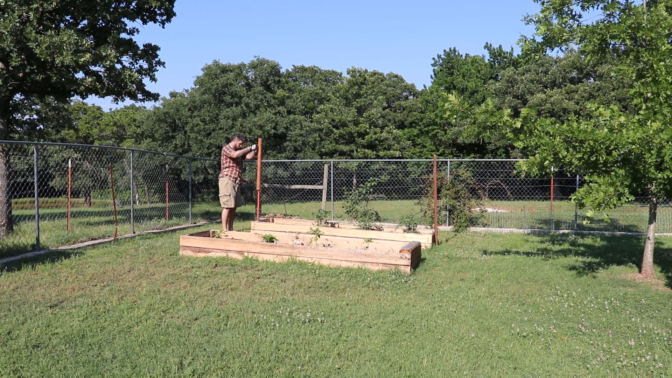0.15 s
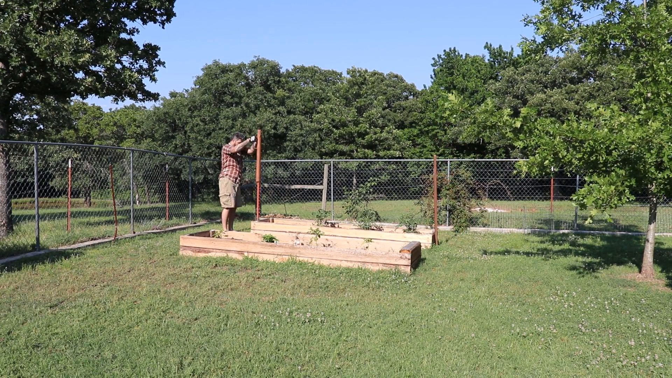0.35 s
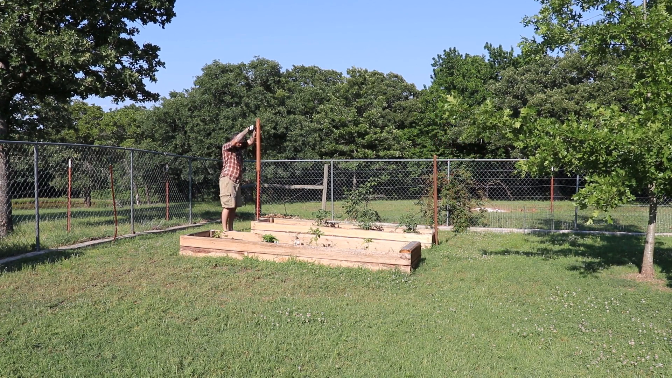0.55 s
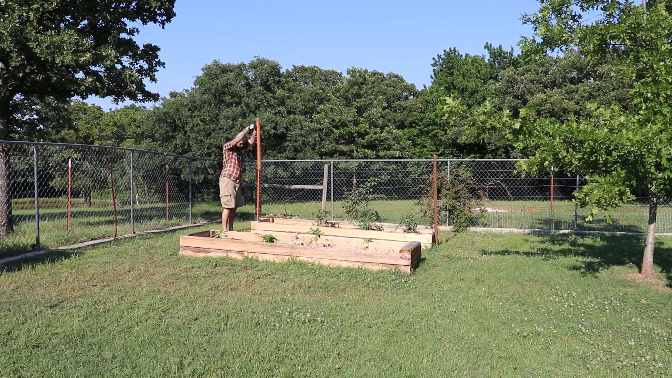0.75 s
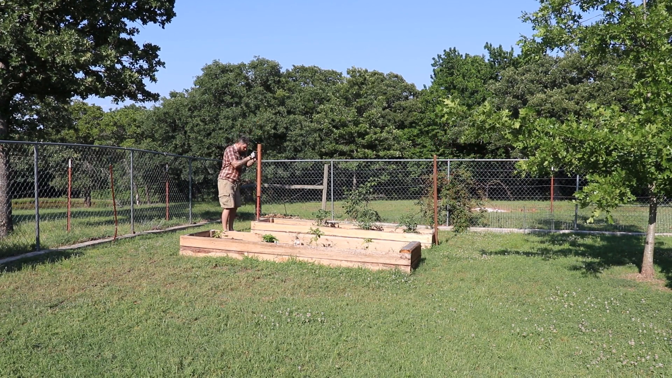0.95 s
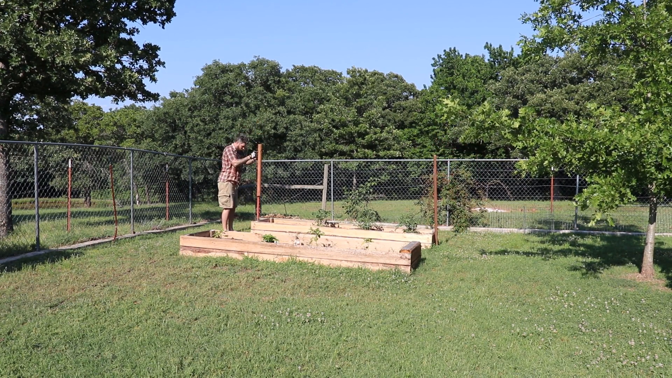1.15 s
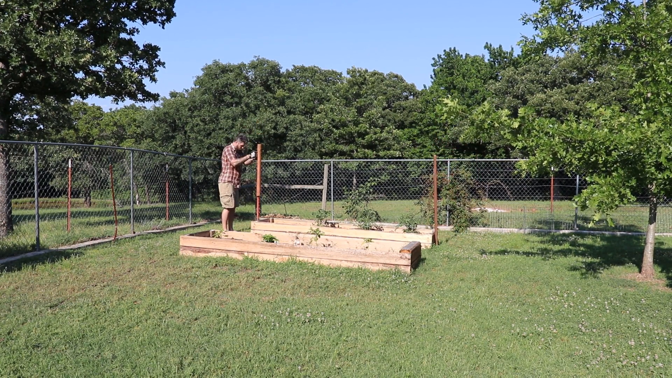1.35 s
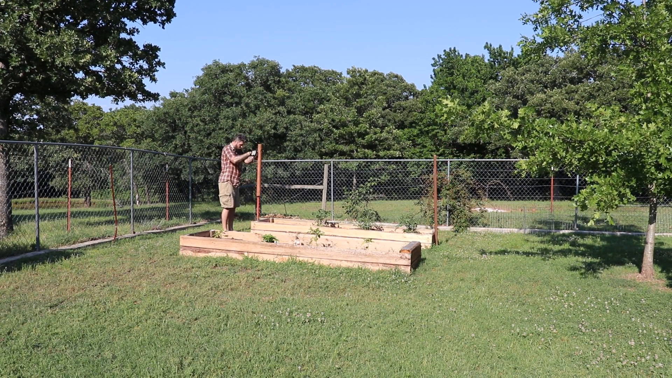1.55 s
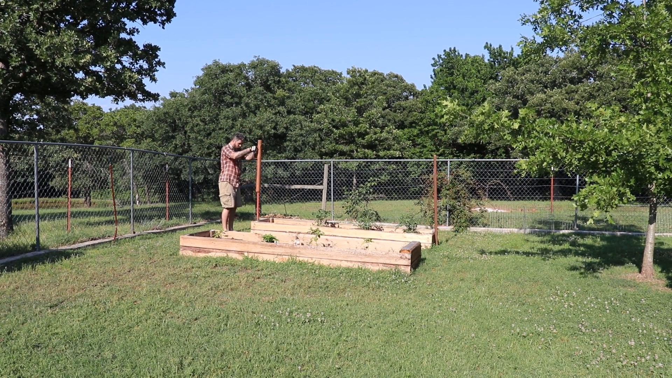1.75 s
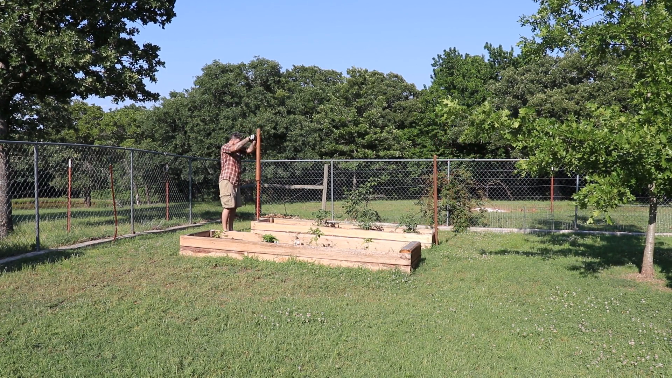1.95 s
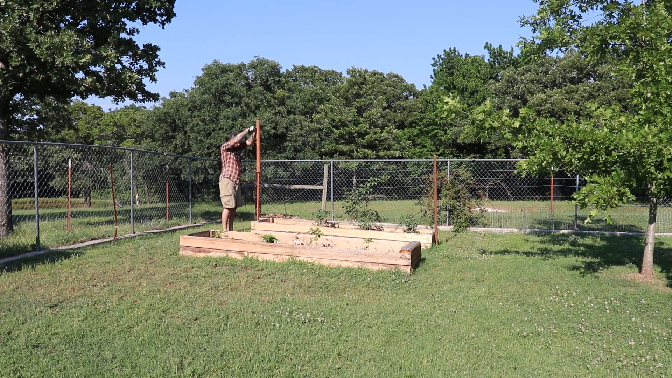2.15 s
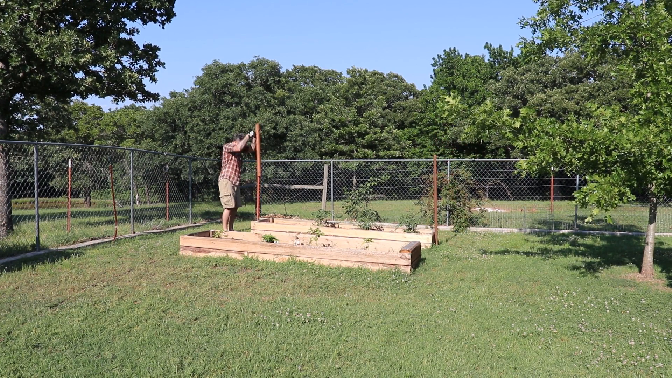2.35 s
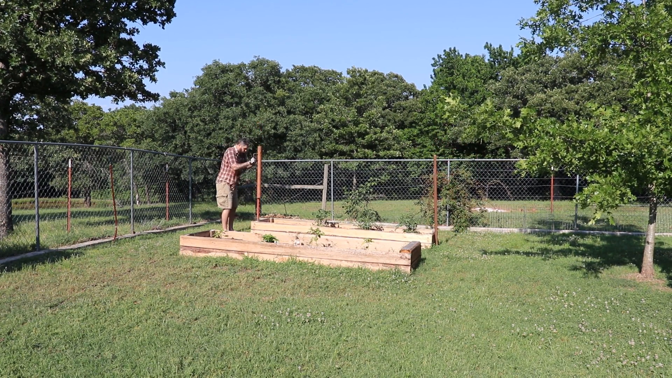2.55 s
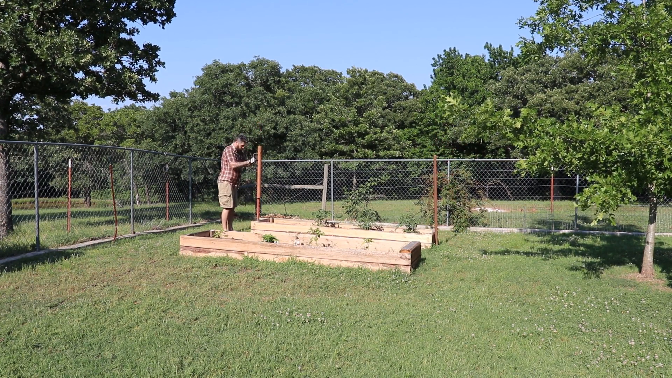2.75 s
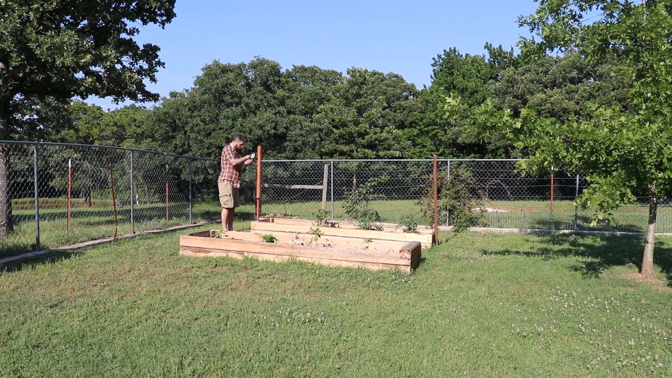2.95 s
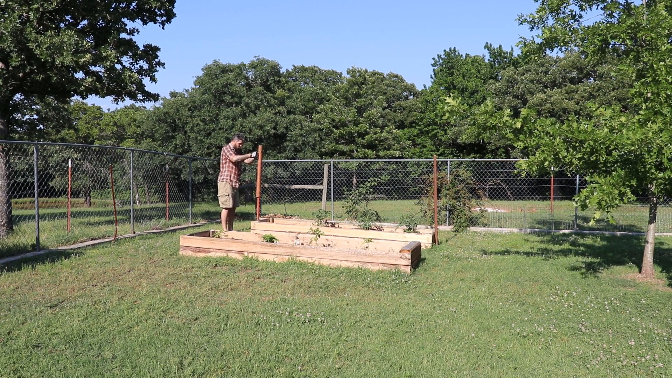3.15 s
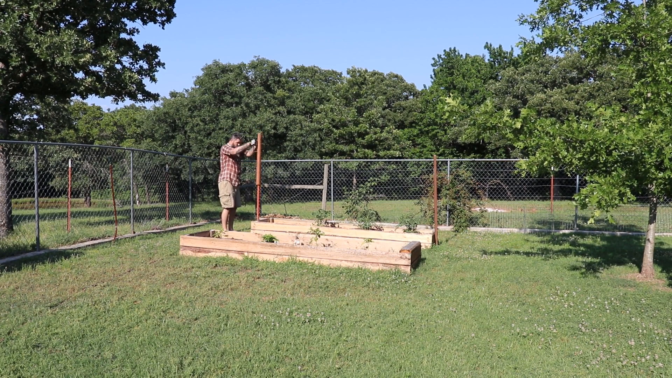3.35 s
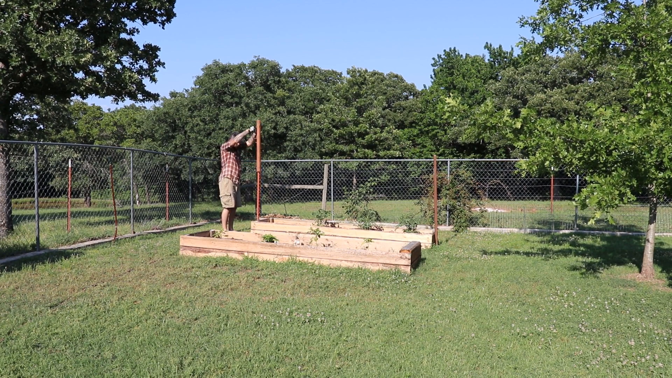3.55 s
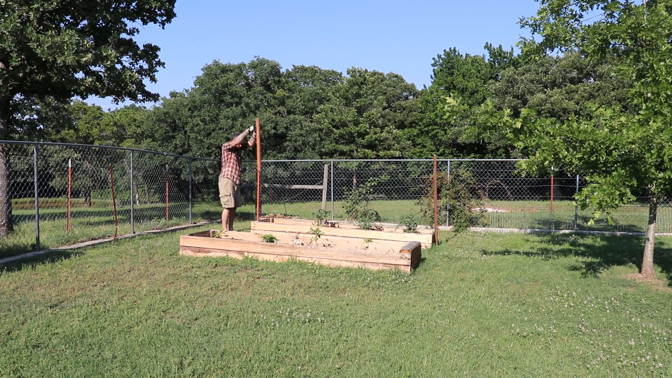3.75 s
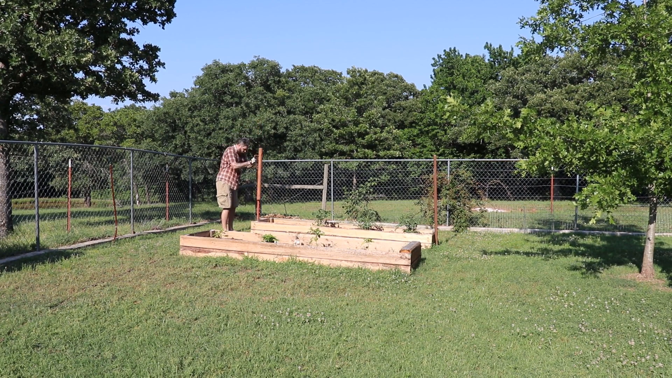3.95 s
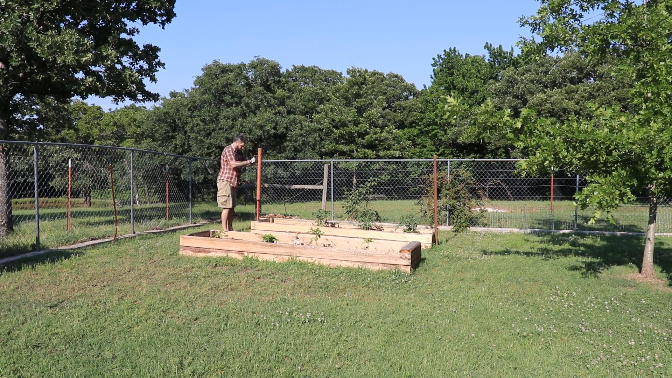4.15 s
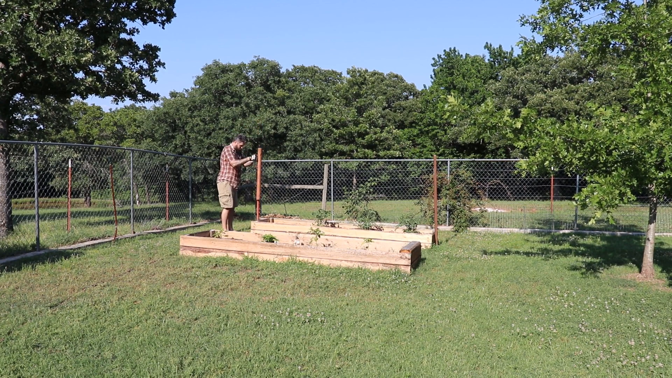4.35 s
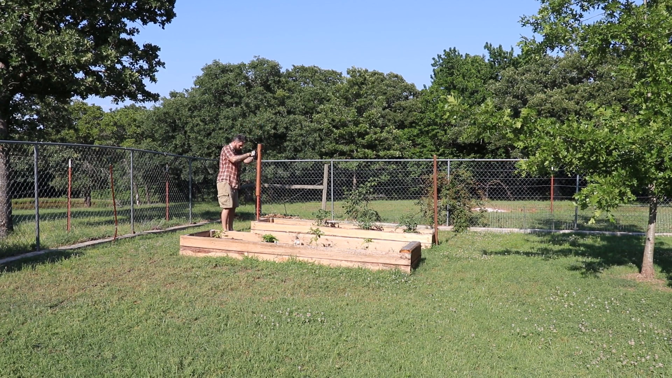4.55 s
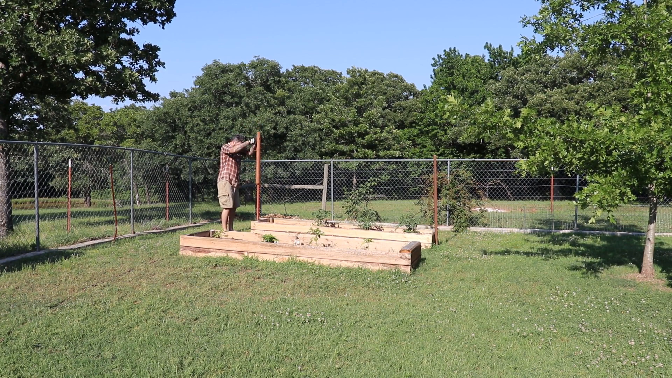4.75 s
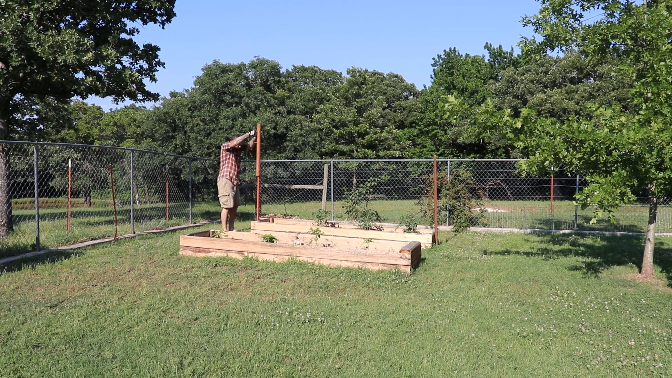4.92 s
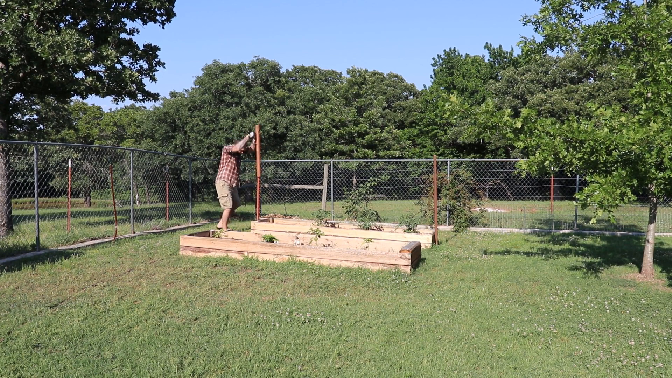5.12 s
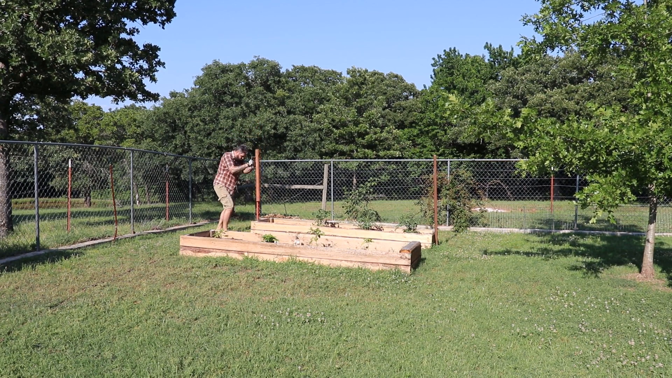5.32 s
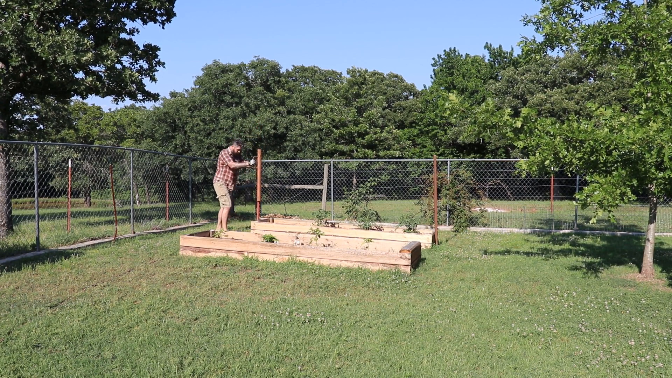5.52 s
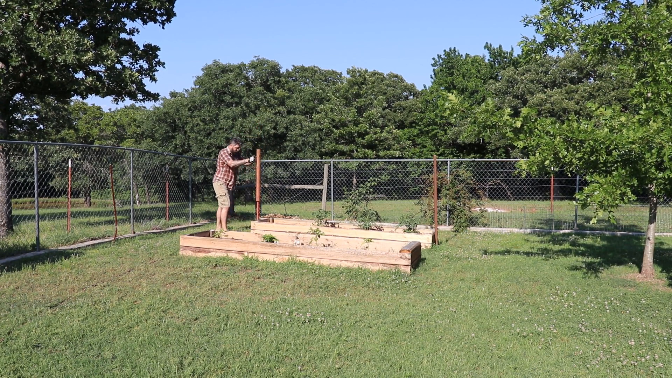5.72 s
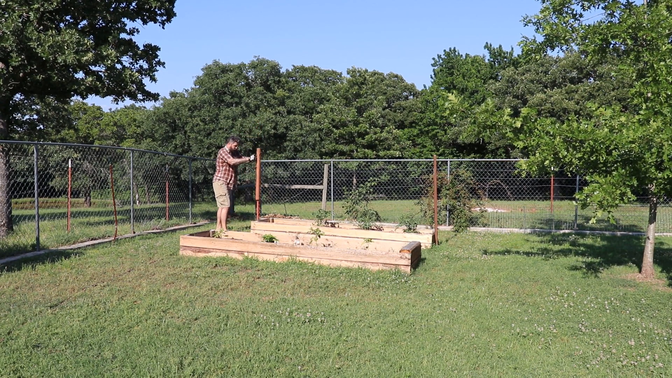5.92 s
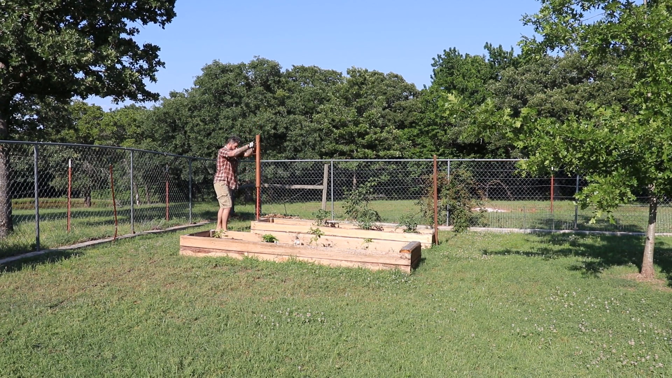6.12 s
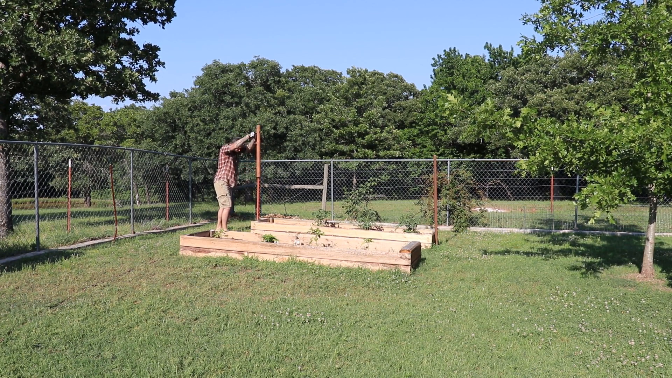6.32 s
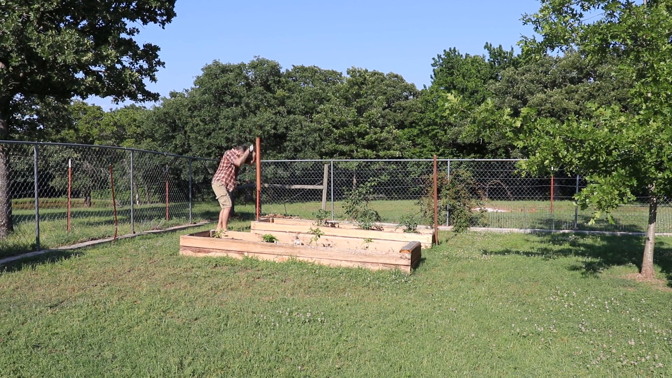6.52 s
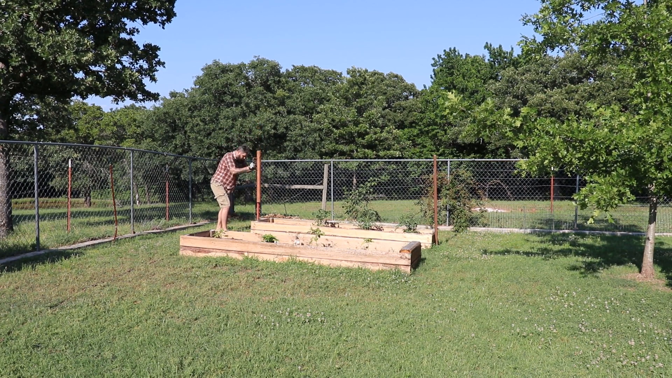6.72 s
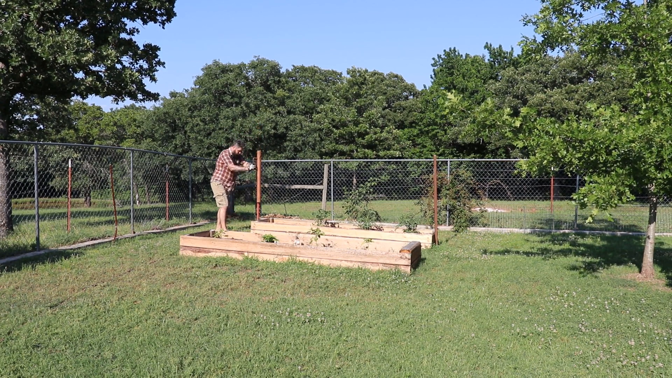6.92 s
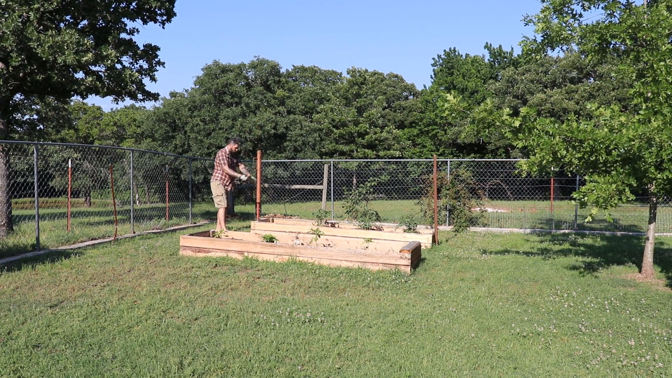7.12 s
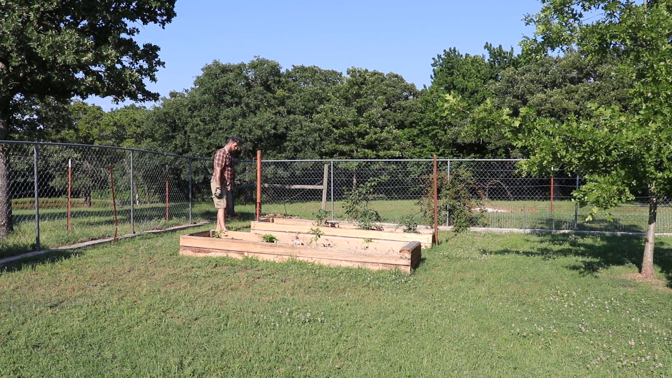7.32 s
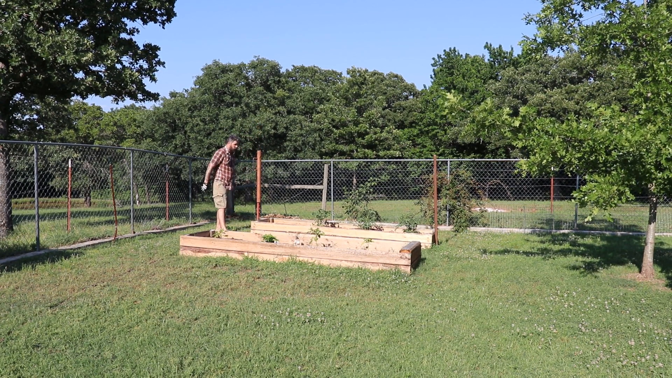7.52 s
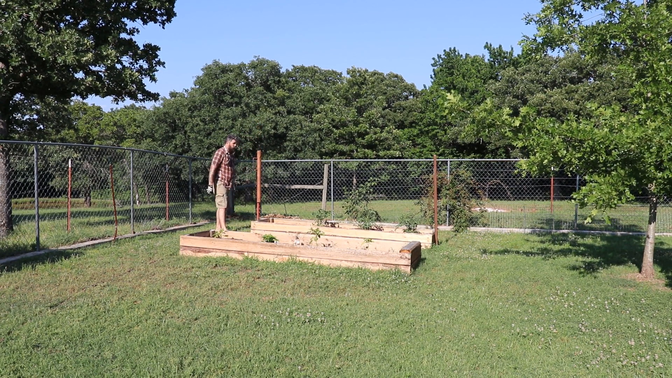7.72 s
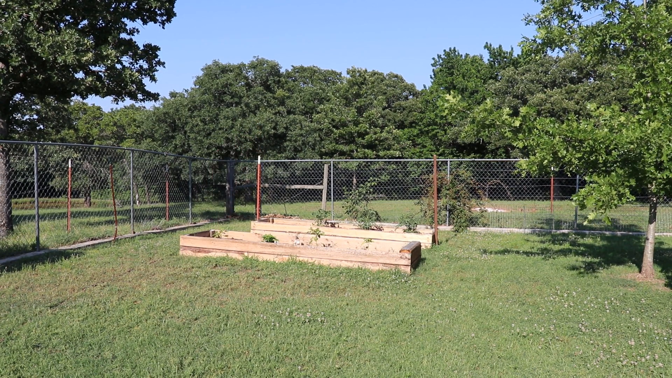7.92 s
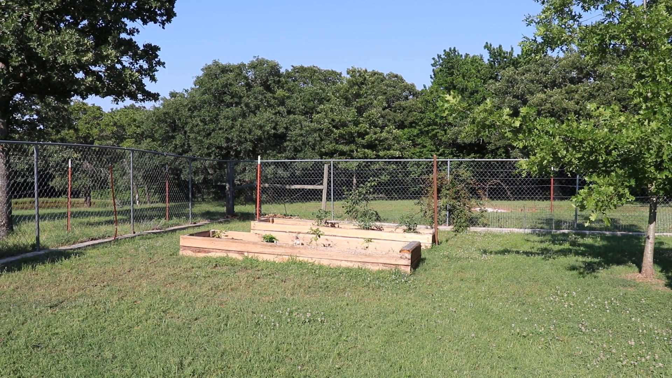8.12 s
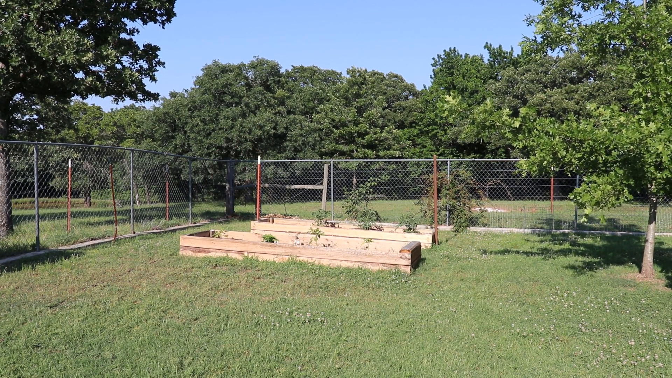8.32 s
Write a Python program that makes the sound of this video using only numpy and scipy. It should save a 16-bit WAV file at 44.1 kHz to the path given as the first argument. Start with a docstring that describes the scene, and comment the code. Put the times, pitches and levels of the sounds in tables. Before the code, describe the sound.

In a breezy garden, a man drives a steel fence post with a heavy capped tube. Light knocks and a rising scrape lead to a quick rattle and a loud, bright slam, five times, about every one and a half seconds. Each clang scatters back from fence and trees. After the last, a soft knock leaves a faint hum. Distant microphone, low wind, tiny bird trills, and a brief close rustle at the end.

```python
"""Fence post driven with a capped steel tube

Five strokes heard across a garden: the tube knocks, scrapes up the post, rattles down and slams home.
Clicks, grains and bursts excite decaying modes of post and tube; a noise tail scatters the clang back.
Filtered noise makes wind, hush and a late rustle; swept sines make a faint bird. Loud peaks duck the gain."""
import sys
import numpy as np
from scipy import signal
from scipy.fft import rfft, irfft, next_fast_len
from scipy.io import wavfile

SR = 44100
rng = np.random.default_rng(int(sys.argv[2]) if len(sys.argv) > 2 else 0)


def transcribe(u):
    """Save the signal u as a 16-bit wav file named by the first command-line argument.

    u: samples, shape (n,) or (channels, n), limited to [-1, 1]; the rate is SR.
    q: integer samples, one column per channel.
    """
    v = np.clip(np.atleast_2d(u).T, -1, 1)
    q = np.round(v * 32767).astype(np.int16)
    wavfile.write(sys.argv[1], SR, q)


N = 373518
TIME = np.arange(N) / SR

# Table levels are relative; gains inside the functions set the mix.
# wind gusts: peak t/s, half length/s, level/dB
GUSTS = [(0.198, 0.36, -44.5), (1.55, 0.17, -47), (2.09, 0.28, -39), (3.67, .12, -37.5), (4.204, .15, -46),
         (5.047, 0.6, -44.5), (5.686, .3, -49.5), (6.797, 0.43, -48)]
# wind colour: f/Hz, density/dB per Hz
WIND_COLOUR = [(15, -0.5), (30, 0.5), (60, -5.5), (100, -10), (160, -20), (300, -33.5), (1000, -52.5)]
# hush colour: f/Hz, density/dB per Hz
HUSH_COLOUR = [(76, -13.5), (130, 1.5), (285, -7), (356, -4.5), (829, -8), (1400, -9), (1580, -10.5),
               (3010, -18), (14500, -24), (16000, -26)]
# small bird's trills: peak t/s, level/dB
TRILLS = [(0.169, -62), (1.90, -57), (3.769, -76), (5.84, -65), (6.381, -78), (7.80, -63.5), (8.10, -63)]
# tube knocks sideways on post: t/s, level/dB, tube hum re knock/dB, tube ring re knock/dB
KNOCKS = [(0.213, -23.5, 0, -5), (0.303, -28, 6, 4.5), (0.825, -43.5, 5.5, 18), (0.862, -28, 4.5, -12.5),
          (.893, -26, -4.5, 9.5), (.942, -21, -22.5, -3), (1.674, -27.5, 4.5, -4.5), (1.707, -24, -7, -7),
          (1.774, -35.5, 1, 10), (1.911, -32.5, 5, 8), (1.948, -34, 5.5, 16), (2.379, -21, -4.5, -0.5),
          (2.461, -18, -16, 6), (2.486, -17, -4, -10.5), (3.205, -18, 0, -4.5), (3.316, -32, -17, 13.5),
          (3.355, -33.5, 8, 14), (3.577, -32, 10, 19.5), (3.845, -26, 2, -1), (3.896, -13.5, -4, -10.5),
          (4.483, -24.5, -7.5, -12), (4.562, -33, -3.5, -8.5), (4.604, -34.5, 4, 10), (4.741, -29.5, -6, 2),
          (5.177, -15.5, -1.5, -4), (5.224, -20, -6.5, 8.5), (5.254, -19, -7.5, 7.5), (5.578, -25, -8, -11),
          (5.763, -27, -2, -1), (5.903, -33.5, -3.5, 0.5), (5.978, -18.5, -2, -13), (6.014, -24.5, -10, 3),
          (6.24, -40.5, 10, 20.5), (6.395, -38, 5, -11), (6.466, -35, 3.5, -5), (6.519, -18, -2.5, -16.5),
          (6.602, -19.5, -14.5, 1.5), (7.322, -30.5, -27, -1)]
# post modes, damped by soil: f/Hz, level/dB, t60/s
POST_MODES = [(415.2, -17, 0.2), (538, -29.5, 0.11), (909, -17, 0.12), (1175.5, -11, 0.24),
              (1209, -19, .22), (1524, -11, 0.12), (1706, -21, 0.41), (1735, -19.5, 0.32),
              (1988, -14.5, 0.18), (2062, -19.5, 0.49), (2387, -14, 0.2), (2530, -23.5, 0.3),
              (2855, -12.5, 0.089), (3217, -17, 0.19), (3380, -31, 0.054), (3870, -14.5, 0.45),
              (4004, -13, 0.23), (4437, -23, 0.25), (4365, -18.5, 0.26), (4800, -14, 0.096),
              (5270, -23, 0.31), (7210, -8.5, 0.091), (7400, -13, .12), (8800, -12, 0.12),
              (9420, -21.5, 0.45)]
# tube wall flexing out of round, low modes: f/Hz, level/dB, t60/s
TUBE_HUM_MODES = [(1340, -12, 0.95), (1397, -18.5, 1.2)]
# the same, high modes: f/Hz, level/dB, t60/s
TUBE_RING_MODES = [(3776, -17.5, 0.45), (3825, -11.5, 0.67), (3840, -39, 0.27), (7195, -11.5, 0.31),
                   (7290, -10, 0.12), (11690, -21, 0.33), (11200, -24, .17)]
# dense short modes under light contacts: f/Hz, density/dB per Hz
CLANK_COLOUR = [(60, -18), (200, -11), (310, 4.5), (420, -7.5), (750, 1), (1300, 1), (2200, 3), (3300, -4),
                (4300, 5.5), (6200, -12.5), (7800, 2.5), (10500, -17.5), (16000, -19.5)]
# garden echo envelope: delay t/s, level/dB
ECHO_ENVELOPE = [(0, 5), (.05, -9), (.11, -9.5), (.128, -5), (.165, 0.5), (.21, -9), (.35, -21.5),
                 (.6, -40.5), (1.0, -59)]
# garden echo colour: f/Hz, level/dB
ECHO_COLOUR = [(100, -1.5), (430, -9.5), (530, -15.5), (620, -0.5), (690, -11.5), (1020, -2), (1200, 11.5),
               (1450, -4), (1700, -3), (2000, 1.5), (2900, -1), (5000, 0.5), (8000, 2), (16000, -6)]
# tube dragged up post: start t/s, fastest t/s, end t/s, friction/dB, hum re friction/dB, ring re friction/dB
LIFTS = [(0.345, 0.525, 0.68, -40.5, 1, 8), (1.946, 2.01, 2.06, -35.5, 3, 3),
         (3.425, 3.496, 3.85, -40.5, 7, 8), (4.703, 4.812, 5.0, -38, 4, 6),
         (6.0, 6.09, 6.27, -34, 7.5, -1.5)]
# tube rim grazes post: start t/s, end t/s, level/dB
GRAZES = [(0.82, .9, -49.5), (2.31, 2.38, -57), (3.744, 3.788, -61.5), (5.151, 5.182, -48),
          (5.766, 5.797, -59), (5.952, 5.981, -41), (6.458, 6.53, -49.5), (7.29, 7.337, -63)]
# tube drops: start t/s, end t/s, rattle level/dB
FALLS = [(.864, 0.997, -18.5), (2.363, 2.477, -25), (3.825, 3.985, -21.5), (5.19, 5.27, -19.5),
         (6.522, 6.612, -18)]
# cap slams onto post: t/s, level/dB, t60/s, tube ring re blow/dB
BLOWS = [(.9700, 3.5, 0.052, 0), (.9870, -4.5, 0.087, -1.5), (2.4939, 4, 0.084, -2), (3.971, 4, 0.056, 3.5),
         (5.2839, 4, 0.067, 7), (6.6103, 6, 0.08, 9.5)]
# dense short modes under a full blow: f/Hz, density/dB per Hz
SLAM_COLOUR = [(40, -12), (125, -3), (240, -16.5), (380, -9), (520, 3), (900, -9), (1250, -5), (1950, -1),
               (2900, -9.5), (3900, -0.5), (6200, -12.5), (7300, -5), (10800, -16), (13500, -17.5),
               (16000, -28)]
# tube and handles, undamped by hands: f/Hz, level/dB, t60/s
LET_GO_MODES = [(902, -36.5, 0.36), (1350, -41, 1.66), (1755, -52, 0.32), (2525, -62, 1.6)]
# soft rustle close by: t/s, level/dB
RUSTLE_ENVELOPE = [(8.238, -85), (8.25, -49.5), (8.3, -51.5), (8.36, -50.5), (8.47, -54.5)]
# rustle colour: f/Hz, density/dB per Hz
RUSTLE_COLOUR = [(120, -24), (200, -3), (569, -26), (623, -22), (722, -33), (1100, -32), (1320, -30.5),
                 (1980, -16), (3900, -22.5), (8740, -18), (16000, -32)]


def from_db(db):
    """Decibels to gain."""
    return 10 ** (np.asarray(db) / 20)


def rms_one(x):
    """Scale to rms 1."""
    return x / np.sqrt(np.mean(x ** 2) + 1e-20)


def at_hz(points, hz):
    """Gain of a spectrum table, interpolated in dB over log frequency."""
    table_hz, db = np.transpose(points)
    return from_db(np.interp(np.log(hz + 1), np.log(table_hz), db))


def noise(spectrum, size=N):
    """Noise of the given colour, rms 1."""
    padded = next_fast_len(size, True)
    white_spectrum = rfft(rng.standard_normal(padded))
    gain = at_hz(spectrum, np.fft.rfftfreq(padded, 1 / SR))
    return rms_one(irfft(white_spectrum * gain, padded)[:size])


def drift(per_s):
    """Slow random wander, spread about 1."""
    knots = rng.standard_normal(4000)
    return np.interp(TIME * per_s, np.arange(len(knots)), knots)


def cut(x, hz, kind="low", order=2):
    """Low-pass or high-pass."""
    sos = signal.butter(order, min(hz, SR / 2 - 1000), kind, fs=SR, output="sos")
    return signal.sosfilt(sos, x + 1e-18)


def add(track, s, piece):
    """Mix a piece in at a time."""
    start = round(s * SR)
    track[..., start:start + piece.shape[-1]] += piece[..., :N - start]


def through(x, response):
    """Convolve with an impulse response."""
    return signal.oaconvolve(x, response)[:N]


def ringing(modes):
    """Decaying sines: the answer of steel to one click."""
    t = TIME[:2 * SR]
    out = np.zeros(len(t))
    for k, (hz, db, t60) in enumerate(modes):
        out += (-1) ** k * from_db(db - 60 * t / t60) * np.sin(2 * np.pi * hz * t)
    return out


def crash(spectrum, t60, hold_s=0):
    """Modes too many and brief to tell apart: a noise burst, held during contact, then decaying."""
    decay_s = np.maximum(TIME[:SR // 2] - hold_s, 0)
    return noise(spectrum, size=SR // 2) * from_db(-60 * decay_s / t60)


def friction(per_s, spread_db, judder_db):
    """Rough steel catches and slips: a stream of uneven tiny impacts, rms 1."""
    sizes = from_db(spread_db * np.minimum(rng.exponential(1, N), 3)) * rng.choice([-1, 1], N)
    strikes = rng.random(N) < per_s / SR
    return rms_one(strikes * sizes * from_db(judder_db * drift(70)))


def wind(breeze_db=-53.5, gain_db=3, wander_db=2):
    """Wind on the microphone: coloured noise; gust powers add to a steady breeze."""
    power = from_db(breeze_db) ** 2
    for s, half_s, db in GUSTS:
        power = power + from_db(db) ** 2 * np.exp(-((TIME - s) / half_s) ** 2)
    return np.sqrt(power) * from_db(gain_db + wander_db * drift(11)) * noise(WIND_COLOUR)


def hush(level_db=-55):
    """Steady coloured noise."""
    return from_db(level_db) * noise(HUSH_COLOUR)


def bird(top_hz=7100, bottom_hz=5800, notes_per_s=88, swell_s=0.022):
    """Trills: quick runs of falling whistles that swell and fade."""
    note = (TIME * notes_per_s + 0.193 * drift(5.4)) % 1
    pitch_hz = top_hz + (bottom_hz - top_hz) * note
    whistle = np.sin(2 * np.pi * np.cumsum(pitch_hz) / SR) * np.sin(np.pi * note)
    swell = sum(from_db(db) / (1 + ((TIME - s) / swell_s) ** 2) ** 2 for s, db in TRILLS)
    return 2 * whistle * swell


def knocks(soft_hz=2970, firm_from_db=-24.5, db_per_octave=5.5, hardest_hz=7100):
    """Forces on post, tube hum and tube ring: above the firm level, harder clicks are brighter."""
    forces, click = np.zeros((3, N)), signal.unit_impulse(SR // 100)
    for s, db, hum_db, ring_db in KNOCKS:
        octaves = max(db - firm_from_db, 0) / db_per_octave
        hard_hz = min(soft_hz * 2 ** octaves, hardest_hz)
        add(forces, s, from_db([[db], [db + hum_db], [db + ring_db]]) * cut(click, hard_hz))
    return forces


def post_modes(force, patchy_db=4, grip_below_hz=1250, grip_db_per_s=1.3, grip_from_s=2.2):
    """Two-pole resonators; the moving contact varies each mode's share of the force."""
    out = np.zeros(N)
    for k, (hz, db, t60) in enumerate(POST_MODES):
        r, w = from_db(-60 / (t60 * SR)), 2 * np.pi * hz / SR
        # as the post sinks, soil takes more from its lowest modes
        grip_db = grip_db_per_s * (TIME - grip_from_s) * (hz < grip_below_hz)
        share = from_db(db - grip_db + patchy_db * np.clip(drift(25), -1.5, 1))
        numerator, denominator = [0, np.sin(w)], [1, -2 * r * np.cos(w), r * r]
        out += (-1) ** k * signal.lfilter(numerator, denominator, force * share + 1e-18)
    return out


def waver(x, depth_s, per_s):
    """The moving contact loads the steel: a wandering time shift bends its pitches slightly."""
    return np.interp(TIME + depth_s * cut(drift(per_s), 50), TIME, x)


def garden(x, echo_db=-15, leaves_hz=5000, treble_loss_db_per_s=28):
    """Fence and trees scatter sound back in uneven clumps; long paths lose treble."""
    t = TIME[:SR]
    scatter = noise(ECHO_COLOUR, size=SR) * from_db(1.5 * drift(200)[:SR])
    dull = cut(scatter, leaves_hz, order=1)
    damped = dull + (scatter - dull) * from_db(-treble_loss_db_per_s * t)
    response = damped * from_db(np.interp(t, *np.transpose(ECHO_ENVELOPE)))
    return from_db(echo_db) * through(x, rms_one(response) / np.sqrt(SR))


def lifts(force_db=-25, split_hz=5500, swell_db_per_s=29.5, fade_db_per_s=62.5, attack_s=0.01,
          treble_db=0, treble_follows=0.13):
    """Friction up the post; it speeds up, then slows, hissing more brightly with speed."""
    forces, grains = np.zeros((3, N)), friction(per_s=700, spread_db=5.5, judder_db=5.0)
    dull, bright = cut(grains, split_hz), cut(grains, split_hz, "high", order=4)
    for start, fastest, end, db, hum_db, ring_db in LIFTS:
        part = slice(round(start * SR), round(end * SR))
        t = TIME[part] - fastest
        speed_db = np.minimum(swell_db_per_s * t, -fade_db_per_s * t)
        hiss = from_db(treble_db + treble_follows * speed_db)   # extra dB of hiss per dB of friction
        contact = np.clip((TIME[part] - start) / attack_s, 0, 1)   # tube leans into the post
        drag = contact * from_db(db + force_db + speed_db) * (dull[part] + hiss * bright[part])
        add(forces, start, drag * from_db([[0], [hum_db], [ring_db]]))
    return forces


def grazes(force_db=-9.5, post_db=-12, ring_db=0, thin_hz=5000):
    """Light, thin rubbing that wakes mostly the tube's high modes."""
    pressure = np.zeros(N)
    for start, end, db in GRAZES:
        pressure += np.interp(TIME, [start, end], [.5, 1], 0, 0) * from_db(db)
    rub = cut(friction(per_s=1200, spread_db=3, judder_db=3), thin_hz, "high")
    return from_db(force_db) * pressure * rub * from_db([[post_db], [post_db], [ring_db]])


def falls(force_db=-28, hard_hz=9000, hum_db=-10, ring_db=-4, attack_s=0.022, gather_db_per_s=17.5):
    """Tube drops, rattling on the post; the rattle sets in, then grows with speed."""
    effort = np.zeros(N)
    for start, end, db in FALLS:
        t = np.arange(start, end, 1 / SR)
        attack = np.minimum((t - start) / attack_s, 1)
        add(effort, start, attack * from_db(db + gather_db_per_s * (t - end)))
    rattle = cut(friction(per_s=330, spread_db=5, judder_db=2), hard_hz, order=1)
    return from_db(force_db) * effort * rattle * from_db([[0], [hum_db], [ring_db]])


def blows(post_db=-21, hum_db=-28, tube_db=-10, thud_s=0.012, thud_hz=1200):
    """Cap lands on post: a broad slam, and a kick to every mode."""
    forces, slams = np.zeros((3, N)), np.zeros(N)
    for s, db, t60, ring_db in BLOWS:
        add(forces, s, from_db(db + np.array([[post_db], [hum_db], [tube_db + ring_db]])))
        burst = crash(SLAM_COLOUR, t60, hold_s=.004)
        bass = cut(burst, thud_hz, order=1)
        bass_loss = 1 - np.exp(-TIME[:len(burst)] / thud_s)   # soil swallows the low thud soonest
        add(slams, s, from_db(db) * (burst - bass * bass_loss))
    return forces, slams


def letting_go(let_go_s=7.323):
    """Undamped modes of tube and handles ring on from the last knock."""
    out = np.zeros(N)
    add(out, let_go_s, ringing(LET_GO_MODES))
    return out


def driver(knock_clank_db=-2, lift_clank_db=-4, fall_clank_db=-1, fall_modes_db=-2, thin_hz=1300):
    """All contacts excite one post and one tube, through clear modes and a dense clank."""
    kicks, slams = blows()
    knock, lift, fall = knocks(), lifts() + grazes(), falls()
    on_post, on_hum, on_ring = knock + lift + from_db(fall_modes_db) * fall + kicks
    on_clank = from_db(knock_clank_db) * knock[0] + from_db(lift_clank_db) * lift[0]
    on_clank = on_clank + from_db(fall_clank_db) * cut(fall[0], thin_hz, "high", order=1)
    place_rad = 2 * drift(25)   # each point of contact wakes a different crowd of modes
    clank = np.zeros(N)
    for share in (np.cos(place_rad), np.sin(place_rad)):
        clank += through(on_clank * share, crash(CLANK_COLOUR, t60=0.12))
    post = waver(post_modes(on_post), depth_s=.0001, per_s=25)
    ring = waver(through(on_ring, ringing(TUBE_RING_MODES)), depth_s=.000035, per_s=25)
    hum = through(on_hum, ringing(TUBE_HUM_MODES))
    return slams + clank + post + ring + hum + letting_go()


def rustle():
    """Coloured noise under a short, flickering envelope."""
    level_db = np.interp(TIME, *np.transpose(RUSTLE_ENVELOPE)) + 1.0 * drift(80)
    return from_db(level_db) * noise(RUSTLE_COLOUR)


def scene():
    """Driver and its echo over the garden's background."""
    steel = driver()
    return (steel + garden(steel) + bird() + wind() + hush() + rustle())[None]


def record(dry, limit_db=-1, release_db_per_s=40, attack_s=.0014, ceiling=.72, cutoff_hz=16600):
    """Gain drops fast on a loud peak and creeps back; overshoot is rounded off, the top is cut."""
    over_db = np.maximum(20 * np.log10(np.abs(dry[0]) + 1e-9) - limit_db, 0)
    release_db = release_db_per_s * TIME
    held_db = np.maximum.accumulate(over_db + release_db) - release_db
    pole = np.exp(-1 / (attack_s * SR))
    ducked = dry * from_db(-signal.lfilter([1 - pole], [1, -pole], held_db))
    rounded = ceiling * np.tanh(ducked / ceiling)
    return signal.sosfilt(signal.cheby2(14, 70, cutoff_hz, fs=SR, output="sos"), rounded)


dry = scene()
out = record(dry)
transcribe(out)
```